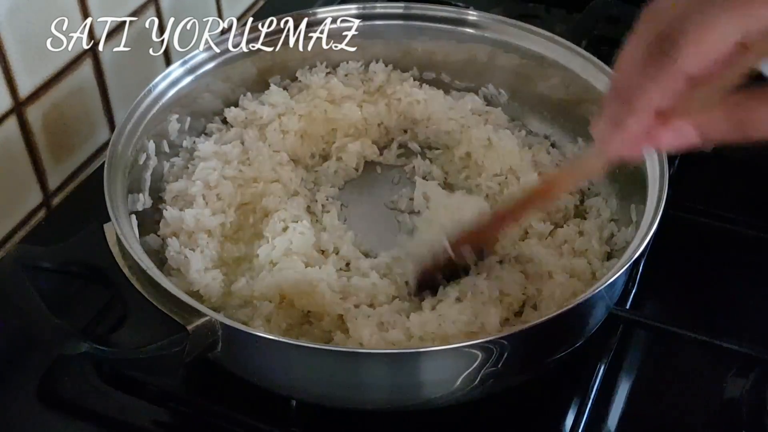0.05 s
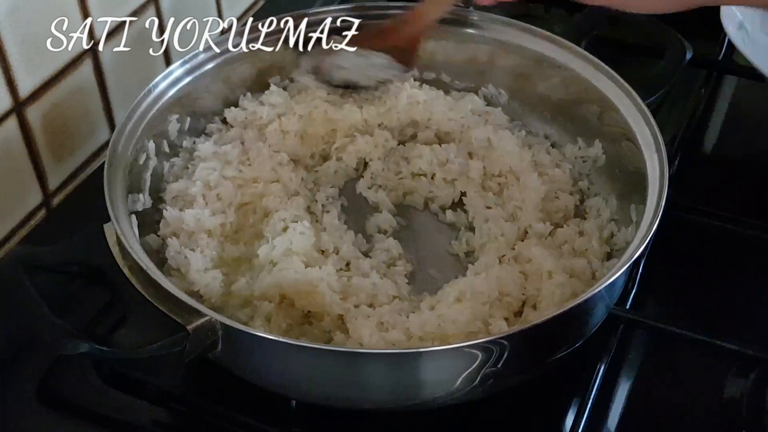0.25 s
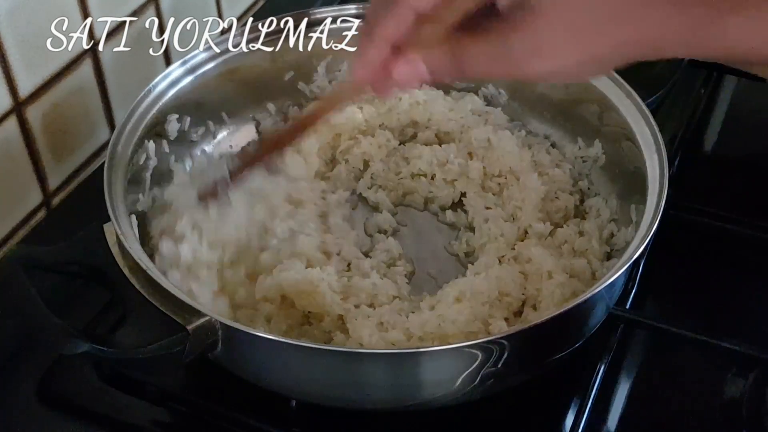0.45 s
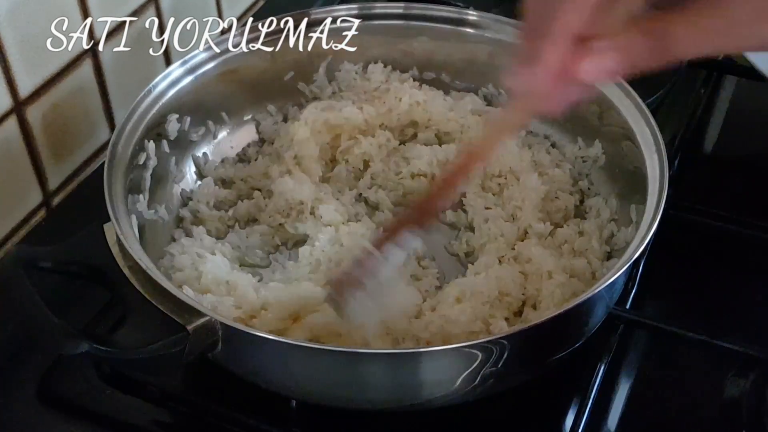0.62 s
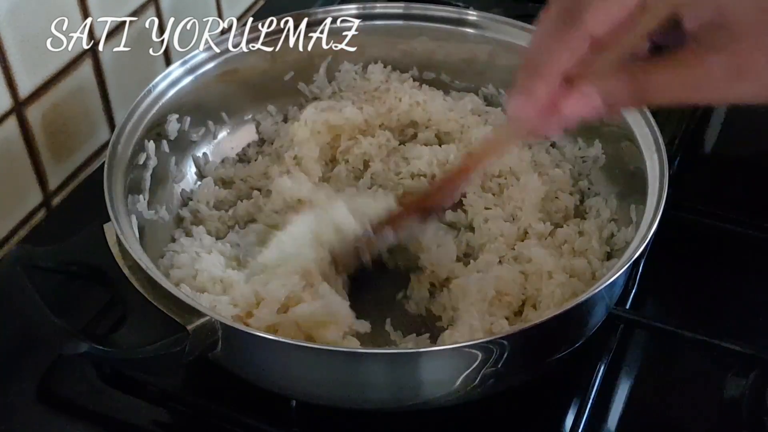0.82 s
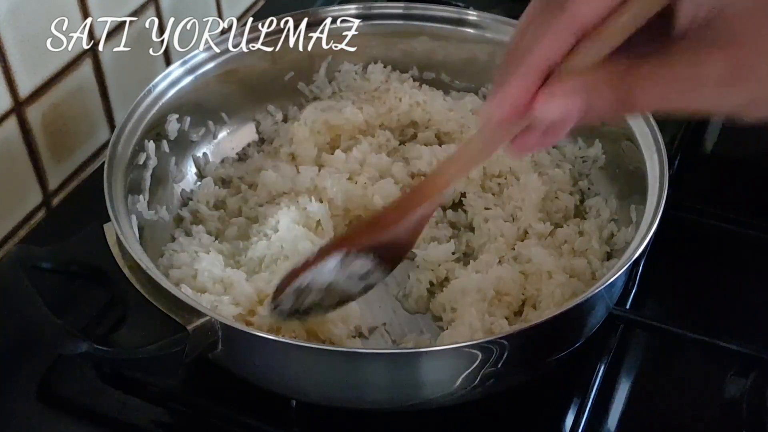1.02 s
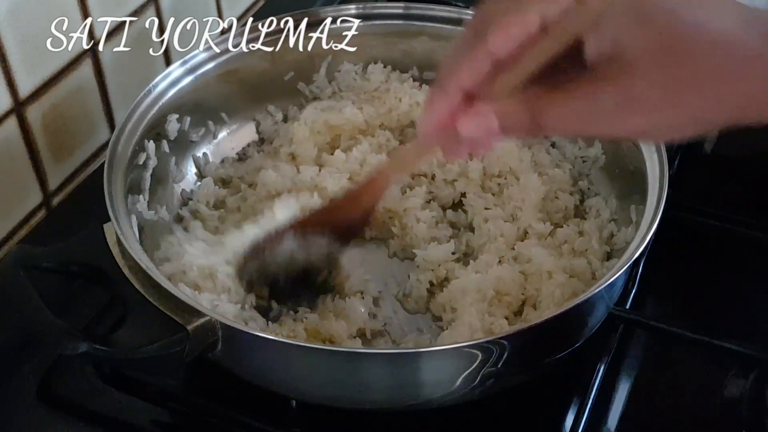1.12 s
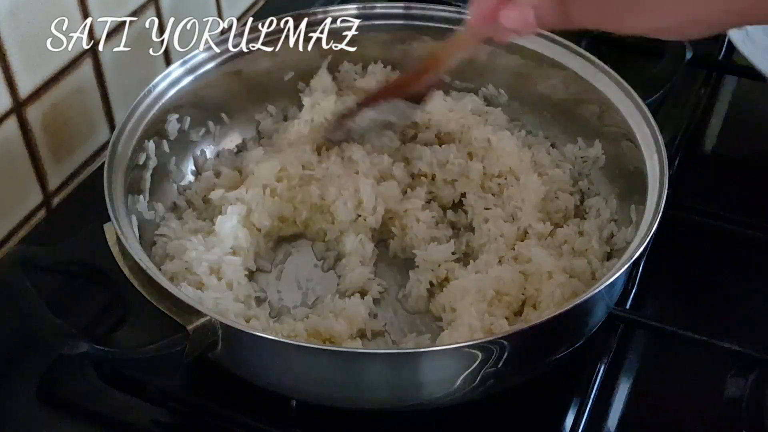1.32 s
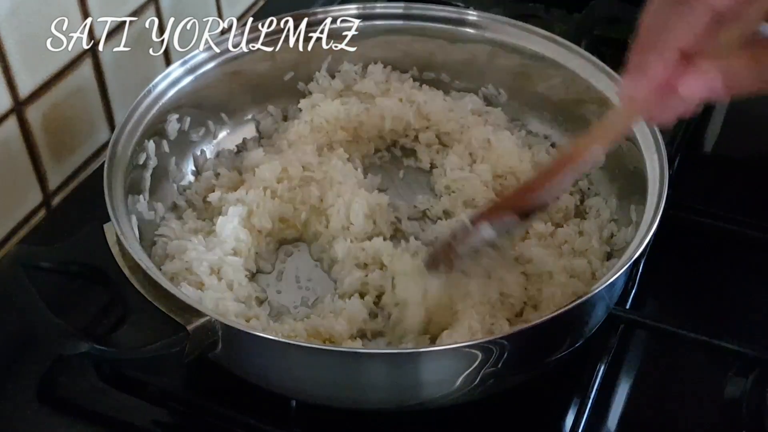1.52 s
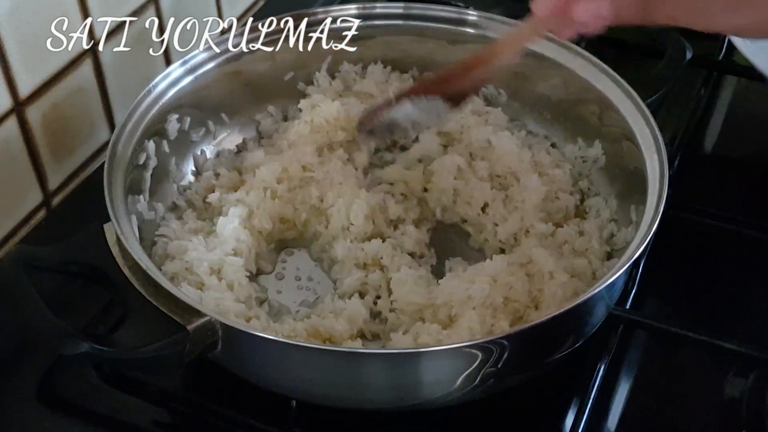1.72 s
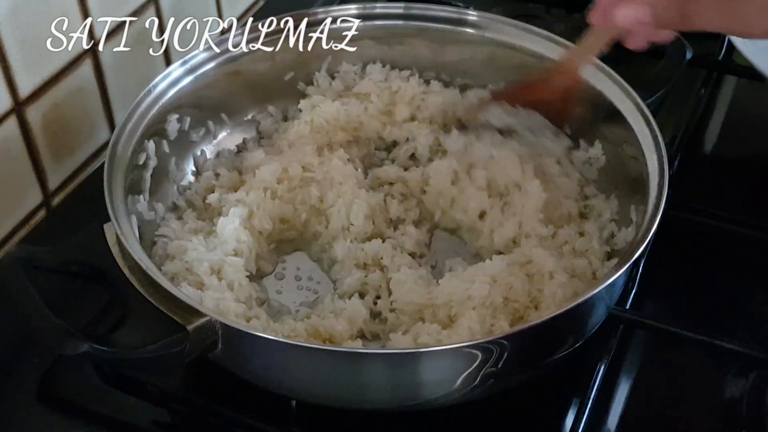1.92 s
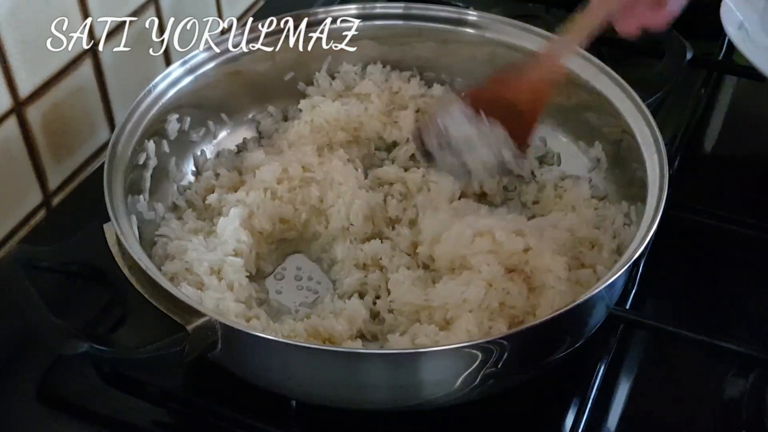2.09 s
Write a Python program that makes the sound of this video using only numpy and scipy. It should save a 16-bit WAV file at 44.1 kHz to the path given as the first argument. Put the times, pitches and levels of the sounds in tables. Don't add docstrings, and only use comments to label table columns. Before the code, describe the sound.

A wooden spoon stirs rice in a steel pan: three clear hollow knocks with faint scrapes, then softer touches. Sharp fat pops scatter between them over thin sizzle, burner hiss and low hum, close in a small tiled kitchen.

```python
import sys
import numpy as np
from scipy import signal
from scipy.fft import rfft, irfft
from scipy.io import wavfile
from scipy.ndimage import uniform_filter1d

SR = 44100
rng = np.random.default_rng(int(sys.argv[2]) if len(sys.argv) > 2 else 0)


def wrap_up_sound(samples):
    columns = np.atleast_2d(samples).T
    tamed = np.clip(columns, -1, 1)
    steps = np.round(tamed * 32767).astype(np.int16)
    wavfile.write(sys.argv[1], SR, steps)


def voltage_ratio(level):
    return 10 ** (np.asarray(level, float) / 20)


N = 94815

# start in
# seconds, peak level in dB, chatter pitch in Hz, length in seconds, # share by which the pitch sags.
TOUCHES = [(0.187, -45, 720, 0.022, 0.058), (.2005, -25.5, 738, 0.0062, 0), (.2048, -24, 650, .0075, 0.064),
           (.2012, -37, 1180, 0.0039, 0.02), (0.2015, -36, 1680, 0.004, 0.044), (.213, -41, 850, .007, 0),
           (0.205, -32, 550, 0.0071, 0.062), (.207, -40, 450, 0.012, 0.058),
           (0.226, -43, 675, 0.0084, 0.035), (0.242, -38, 690, 0.01, 0), (.4655, -46, 1100, .004, 0),
           (.468, -48, 580, .012, 0), (.4935, -44, 620, 0.006, 0), (.8812, -33.5, 2466, 0.0026, 0.048),
           (0.8809, -21.5, 1300, 0.0032, 0.14), (.884, -28, 1220, 0.0089, 0.1),
           (0.886, -27, 1700, 0.0059, -0.049), (.8808, -35, 380, 0.0048, 0),
           (.8812, -30, 720, 0.0041, 0.043), (.886, -29, 570, .005, 0), (.8895, -27, 820, .007, -0.031),
           (.888, -36, 445, 0.0097, 0), (0.8911, -23.5, 620, 0.004, 0), (0.902, -39, 752, 0.0077, 0.094),
           (.93, -41, 635, .007, 0.019), (.936, -41, 1130, .009, 0), (1.261, -41.5, 2690, 0.0047, 0.06),
           (1.2645, -40.5, 2080, 0.005, 0.018), (1.2613, -21.5, 1220, 0.0035, 0.38),
           (1.2624, -22, 752, 0.00674, 0.032), (1.265, -31.5, 1730, 0.004, 0.063),
           (1.268, -29, 458, 0.0093, 0.078), (1.27, -41, 1063, .008, 0), (1.274, -39, 810, 0.0064, 0.053),
           (1.297, -35.5, 708, 0.012, -0.013), (1.333, -44, 876, 0.0067, 0),
           (1.354, -44, 742, 0.011, -0.22), (1.731, -51, 714, 0.0098, 0), (1.744, -36.5, 672, 0.0061, 0),
           (1.748, -31, 630, 0.0074, 0.1), (1.746, -37.5, 449, .01, 0.023),
           (1.757, -36.5, 460, 0.0086, 0.04), (1.787, -50, 694, .01, -0.018)]
# middle in seconds, half length in seconds, level in dB, grain pitch in Hz.
DRAGS = [
    (0.46, 0.053, -55, 620),
    (0.49, 0.045, -62, 440),
    (1.26, 0.069, -51, 1100),
    (0.84, 0.02, -62, 450),
    (0.864, 0.044, -51.5, 1800),
    (0.38, .05, -62, 1200),
    (1.35, 0.028, -55, 830),
    (1.47, 0.067, -60, 770),
    (1.952, 0.083, -53.5, 1300),
]
# frequency in Hz, level in dB, T60 in seconds.
PAN = [(262, -14, 0.12), (389, -12.5, 0.16), (460, -3.5, 0.17), (564, -5.5, 0.2), (678, -9.5, 0.13),
       (718, -13, 0.19), (830, -4.5, 0.17), (867, -9.5, 0.2), (1052, -17, 0.3), (1130, -12, 0.17),
       (1220, -7, 0.11), (1480, -29, 0.12), (1700, -9, 0.086), (2220, -16, 0.15)]
# frequency in Hz, left minus right in dB.
LEAN = [(400, -0.5), (700, 7.5), (1300, -11), (2500, 7.5)]
# start in seconds, peak level in dB, centre in Hz, T60 in seconds.
CRACKS = [
    (0.1999, -40.5, 2020, 0.091),
    (0.8812, -30.5, 2120, 0.062),
    (0.881, -35, 5400, 0.041),
    (1.2616, -37, 2120, 0.049),
]
# start in seconds, peak level in dB, pitch in Hz, broad edge in dB.
POPS = [(0.054, -53, 5490, 17), (0.0974, -58, 3700, -9), (0.1125, -45, 4930, -13),
        (0.1333, -48.5, 4900, 17), (0.16, -55, 3030, 11), (0.3193, -32, 13330, -5.5),
        (0.3444, -60, 6700, -2), (.345, -49, 12000, 4), (.379, -47, 10000, 2), (0.427, -44.5, 6440, 8.5),
        (0.437, -41.5, 7650, 2), (0.6305, -27.5, 7830, -17), (0.6629, -43, 6810, -5),
        (0.772, -53, 6720, -3), (0.814, -47, 6800, 10), (0.8296, -39, 6050, -7), (0.8364, -36, 5750, -2),
        (1.007, -55, 4150, 12.5), (1.1478, -54, 6700, -1), (1.1688, -30.5, 6840, -9),
        (1.194, -43.5, 6600, -2), (1.3094, -53, 6720, -7), (1.342, -45, 4400, -5), (1.473, -44, 4030, -2),
        (1.4764, -39, 8340, 4.5), (1.4765, -37.5, 5650, -8), (1.513, -50, 6500, 3), (1.523, -46.5, 3900, 1),
        (1.528, -51, 3000, 2), (1.6882, -42, 2740, -15), (1.7369, -43, 2510, -16), (1.7561, -38.5, 2700, 0),
        (1.758, -54, 3150, 0), (1.7749, -48, 6550, 2), (1.7993, -43, 3110, 2), (1.804, -48, 6500, 4),
        (1.8844, -49, 7500, -3), (1.9552, -45.5, 6720, -2), (1.977, -45, 6720, 3), (2.0017, -41, 4650, 5),
        (2.004, -44, 13500, 0), (2.017, -48, 5500, 0), (2.0283, -50, 6850, 0)]
# time in seconds, level in dB.
SIZZLE_EFFORT = [(0.0, -60), (1.2, -65.5), (1.33, -60), (1.72, -76.5), (2.15, -60)]
# start in seconds, levels in dB of the second, third and fourth stove modes.
THUDS = [
    (0.212, -44, -38.5, -35),
    (.49, -55, -44, -37),
    (0.896, -40.5, -39, -53),
    (1.011, -49, -54, -41),
    (1.27, -36, -39, -33.5),
    (1.763, -42.5, -44.5, -39.5),
]
# frequency in Hz, T60 in seconds.
STOVE = [(52, 0.38), (93, 0.24), (155, 0.37), (210, 0.16)]
# frequency in Hz, density in dB per Hz.
HISS = [(40, 2.5), (200, -2.5), (300, -8.5), (800, -10), (1730, -10.5), (2560, -14.5), (7500, -19),
        (14500, -21)]
# frequency in Hz, width in Hz, level in dB.
FLAME = [(1200, 32, -73.5), (1401, 53, -65), (1751, 133, -59), (6720, 140, -66), (8370, 550, -69)]
# frequency in Hz, level in dB, wavering in dB.
HUM = [(49, -57, 4), (101.8, -62, -1), (147.6, -59.5, 3)]
# frequency in Hz, T60 in seconds, level in dB.
KITCHEN = [(232, 0.35, 3), (376, 0.28, -4), (600, 0.3, -3.5), (984, 0.35, 2.5), (1570, 0.14, -2.5),
           (2290, 0.21, 5.5), (4270, 0.2, 9.5), (9450, 0.1, 6.5)]
# frequency in Hz, left-right likeness from 0 to 1.
LIKENESS = [(100, 0.87), (400, 0.65), (1000, 0.2), (2500, 0.033), (12000, 0.013)]

HALF_EACH_WAY = np.array([[0.5], [-0.5]])
CHATTER_HOLD = 0.64
CONTACT_CYCLES, BLOW_DB, DRAG_ROUGH_DB = 1.133, -4, 3
PAN_DB, LONGEST_RING_S, LEFT_LAG_SAMPLES = -43, 0.3, 3
POP_RING_CYCLES, POP_T60_S, POP_RISE_S = 85, 0.021, 0.00045
SIZZLE_PER_S, SIZZLE_SPREAD_DB, SIZZLE_DB, LOUDEST_SHARE = 430, 2, -63.5, 0.01
THUD_RISE_S, DEEP_DB = 0.013, -3.5
HISS_DB = -53
KITCHEN_DB, KITCHEN_GAP_S = -13.5, 0.003065
ECHO_S, ECHO_DB, ECHO_HZ, ECHO_WIDTH_HZ = 0.043, -21, 615, 990
BOTTOM_HZ, TOP_HZ = 42, 14650


def unit(x):
    return x / np.sqrt(np.mean(x ** 2))


def read(table, hz):
    table = np.array(table, float)
    return np.interp(np.log(hz + 1), np.log(table[:, 0] + 1), table[:, 1])


def band(x, hz, width_hz):
    hz = min(hz, 0.4 * SR)
    b, a = signal.iirpeak(hz, hz / width_hz, fs=SR)
    return signal.lfilter(b, a, x)


def ring(x, hz, t60_s):
    pole = np.exp((2j * np.pi * hz - np.log(1000) / t60_s) / SR)
    return signal.lfilter([1], [1, -pole], x).imag


def walk(rate_hz):
    k = int(SR / rate_hz)
    held = np.repeat(rng.standard_normal(N // k + 1), k)
    return 1.475 * uniform_filter1d(uniform_filter1d(held, k), k)[:N]


def pair(size):
    alike = np.clip(read(LIKENESS, np.fft.rfftfreq(size, 1 / SR)), 0, 1)
    mid, side = rfft(rng.standard_normal((2, size)))
    mid = mid * np.sqrt((1 + alike) / 2)
    side = side * np.sqrt((1 - alike) / 2)
    return irfft(np.array([mid + side, mid - side]), size)


def add(out, start_s, x):
    i = int(start_s * SR)
    out[:, i:i + x.shape[-1]] += x[..., :N - i]


def leaning(db, hz):
    return voltage_ratio(db + HALF_EACH_WAY * read(LEAN, hz))


def spoon():
    chatters, push, t = np.zeros((2, N)), np.zeros((1, N)), np.arange(N) / SR
    for start, db, hz, length, sag in TOUCHES:
        u = np.arange(int(length * SR)) / (length * SR)
        swell = np.sin(np.pi * u ** 0.46) ** CHATTER_HOLD
        cycles = hz * length * (u - sag * (u ** 2 - u) / 2)
        add(chatters, start, -leaning(db, hz) * swell * np.sin(2 * np.pi * cycles))
        k = int(CONTACT_CYCLES * SR / hz)
        phase = np.pi * np.arange(k) / k
        blow = np.sin(2 * phase) * np.sin(phase)
        add(push, start + length / 3, voltage_ratio(db) * 4 / (hz * length) * blow)
    grit = voltage_ratio(DRAG_ROUGH_DB * walk(150)) * rng.standard_normal(N)
    for middle, half, db, hz in DRAGS:
        stroke = np.exp(-((t - middle) / half) ** 2)
        push = push + voltage_ratio(db) * stroke * unit(band(grit, hz, hz))
    pan = np.zeros((2, N))
    for hz, db, t60 in PAN:
        pan += leaning(db, hz) * ring(push, hz, min(t60, LONGEST_RING_S))
    return chatters + voltage_ratio(BLOW_DB) * push + voltage_ratio(PAN_DB) * pan


def cracks():
    out, t = np.zeros((2, N)), np.arange(4000) / SR
    rise = 1 - np.exp(-t / 0.00046)
    for start, db, hz, t60 in CRACKS:
        grain = band(band(pair(len(t)), hz, hz * 0.62), hz, hz * 2.1)
        add(out, start, 0.5 * voltage_ratio(db - 60 * t / t60) * rise * unit(grain))
    return out


def pops():
    out, t = np.zeros((2, N)), np.arange(3000) / SR
    rise = 1 - np.exp(-t / POP_RISE_S)
    for start, db, hz, broad_db in POPS:
        a, b = rng.standard_normal((2, len(t)))
        noise = np.array([a + 1.2 * b, a - 0.75 * b])
        tone = np.sin(2 * np.pi * hz * t + np.array([[0], [1.2]]))
        spray = unit(band(noise, hz, hz * 0.26))
        bubble = voltage_ratio(-60 * t * hz / POP_RING_CYCLES) * (0.82 * tone + 0.9 * spray)
        broad = voltage_ratio(broad_db - 60 * t / POP_T60_S) * unit(band(noise, 8700, 12500))
        add(out, start, voltage_ratio(db) * rise * (0.58 * bubble + 0.41 * broad))
    return out


def sizzle():
    happens, size = rng.random((2, N))
    clicks = (happens < SIZZLE_PER_S / SR) * voltage_ratio(-SIZZLE_SPREAD_DB * np.log(size + LOUDEST_SHARE))
    tail_s = 0.0039
    gate = unit(signal.lfilter([1], [1, -np.exp(-1 / (tail_s * SR))], clicks))
    time_s, db = np.transpose(SIZZLE_EFFORT)
    effort_db = np.interp(np.arange(N) / SR, time_s, db - db.mean())
    return voltage_ratio(SIZZLE_DB + effort_db) * gate * unit(band(pair(N), 6200, 10300))


def stove():
    out, t = np.zeros((2, N)), np.arange(SR // 2) / SR
    rise = 1 - np.exp(-t / THUD_RISE_S)
    for start, *dbs in THUDS:
        mode_dbs = [dbs[0] + DEEP_DB] + dbs
        for (hz, t60), db in zip(STOVE, mode_dbs):
            add(out, start, voltage_ratio(db - 60 * t / t60) * rise * np.sin(2 * np.pi * hz * t))
    return out


def flame():
    hz = np.fft.rfftfreq(N, 1 / SR)
    spectrum = rfft(pair(N)) * voltage_ratio(read(HISS, hz))
    hiss, tones = np.zeros((2, N)), np.zeros((2, N))
    for centre_hz in 30 * 2.0 ** np.arange(10):
        octaves = np.clip(np.log2(hz / centre_hz + 1e-9), -1, 1)
        share = np.cos(octaves * np.pi / 2) ** 2
        hiss += irfft(spectrum * share, N) * voltage_ratio(1.4 * walk(9.51))
    for tone_hz, width, db in FLAME:
        whistle = band(band(pair(N), tone_hz, width), tone_hz, 2 * width)
        tones += voltage_ratio(db + 1.3 * walk(24.68)) * unit(whistle)
    return voltage_ratio(HISS_DB) * unit(hiss) + tones


def hum():
    out = np.zeros(N)
    for (hz, db, waver_db), rate_hz in zip(HUM, (9, 25, 30)):
        cycles = np.cumsum(hz * (1 + 0.02976 * walk(16))) / SR
        out += voltage_ratio(db + 1.5 + waver_db * walk(rate_hz)) * np.sin(2 * np.pi * cycles)
    return out * voltage_ratio(np.array([[-0.9], [0.9]]))


def kitchen(x):
    t = np.arange(SR // 2) / SR
    noise, tail = pair(len(t)), np.zeros((2, len(t)))
    for hz, t60, db in KITCHEN:
        tail += voltage_ratio(db - 60 * t / t60) * band(noise, hz, hz * 0.69)
    tail *= t > KITCHEN_GAP_S
    tail /= np.sqrt(np.sum(tail ** 2) / 2 / len(KITCHEN))
    return voltage_ratio(KITCHEN_DB) * signal.fftconvolve(x.mean(0)[None], tail)[:, :N]


def scene():
    knocks = spoon()
    knocks[0] = np.roll(knocks[0], LEFT_LAG_SAMPLES)
    near = knocks + cracks() + pops()
    swapped = knocks[::-1]
    add(near, ECHO_S, voltage_ratio(ECHO_DB) * band(swapped, ECHO_HZ, ECHO_WIDTH_HZ))
    background = sizzle() + voltage_ratio(HALF_EACH_WAY) * flame() + hum()
    return near + kitchen(near) + stove() + background


def top_cut(x):
    return signal.sosfilt(signal.butter(12, 15670, fs=SR, output="sos"), x)


def record(dry):
    bass_cut = signal.butter(4, BOTTOM_HZ, "high", fs=SR, output="sos")
    treble_cut = signal.ellip(10, 0.5, 50, TOP_HZ, fs=SR, output="sos")
    mix = signal.sosfilt(treble_cut, signal.sosfilt(bass_cut, dry))
    return top_cut(mix)


dry = scene()
out = record(dry)
wrap_up_sound(out)
```